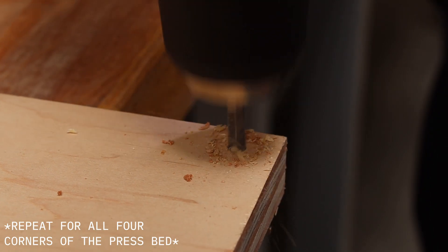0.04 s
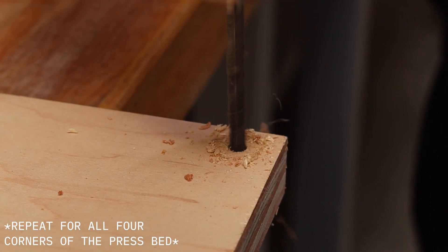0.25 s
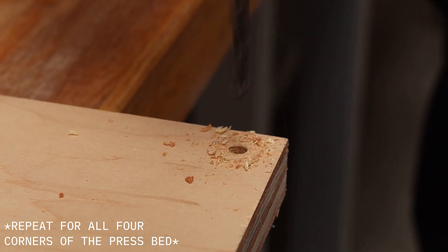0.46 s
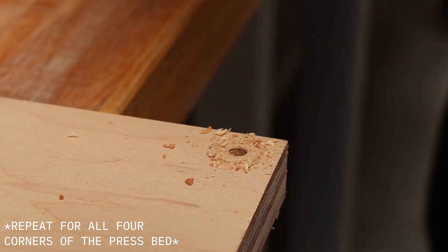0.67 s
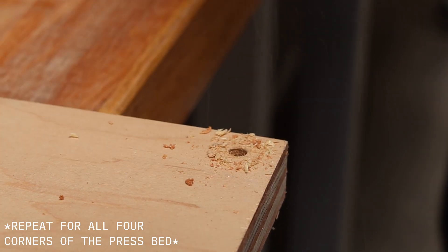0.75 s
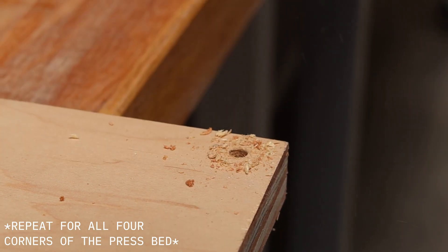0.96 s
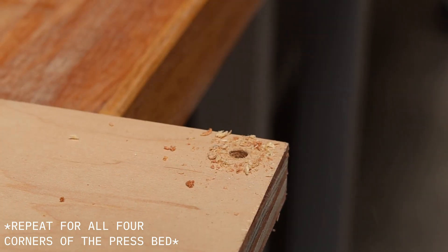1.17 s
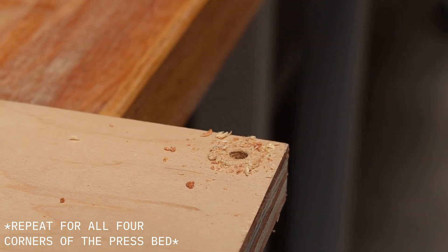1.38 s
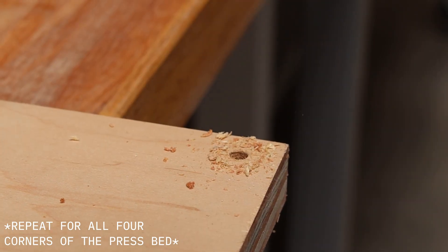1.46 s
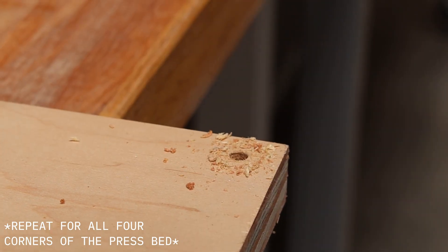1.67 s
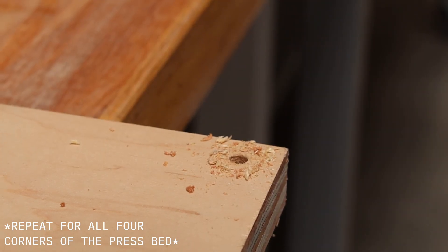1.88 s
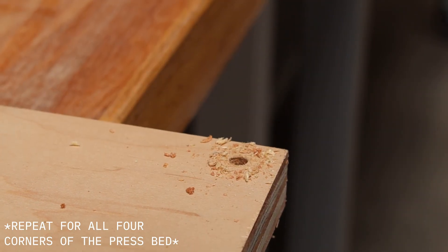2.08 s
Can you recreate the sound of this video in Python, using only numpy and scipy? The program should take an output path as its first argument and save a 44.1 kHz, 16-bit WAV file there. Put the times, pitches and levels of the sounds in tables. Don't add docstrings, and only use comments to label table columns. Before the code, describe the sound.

A handheld drill, already running, backs out of plywood close to a stereo microphone; its shrill whine rises slightly, sags and stops at about 0.6 seconds with hard clacks, leaving workshop echo, low hum and faint cloth rustle.

```python
import sys
import numpy as np
from scipy import signal
from scipy.fft import rfft, irfft
from scipy.io import wavfile
from scipy.ndimage import uniform_filter1d, map_coordinates

SR = 44100
rng = np.random.default_rng(int(sys.argv[2]) if len(sys.argv) > 2 else 0)


def how_loud(loudness_db):
    steps = np.asarray(loudness_db, float) / 20
    return 10 ** steps


def materialize(psi):
    bounded = np.clip(np.atleast_2d(psi).T, -1, 1)
    quanta = np.round(bounded * 32767).astype(np.int16)
    wavfile.write(sys.argv[1], SR, quanta)


N = 94109
T = np.arange(N) / SR
BIT_OUT_S, STOP_S, STOP_FADE_S = 0.344, 0.594, 0.003


def unit(x):
    return x / np.sqrt(np.mean(x ** 2) + 1e-30)


def on_hz(table, hz):
    a = np.array(table, float)
    return np.interp(np.log(hz + 1), np.log(a[:, 0]), a[:, 1])


def colour(x, table):
    hz = np.arange(N // 2 + 1) * SR / N
    return irfft(rfft(x) * how_loud(on_hz(table, hz)), N)


def ring(x, peaks):
    out = 0
    for k, (hz, width, db) in enumerate(peaks):
        b, a = signal.iirpeak(hz, hz / width, SR)
        out = out + (-1) ** k * how_loud(db) * signal.lfilter(b, a, x)
    return out


def walk(rate):
    k = int(SR / rate)
    return unit(uniform_filter1d(uniform_filter1d(rng.standard_normal(N), k), k))


def until(end_s, fade_s):
    return 1 / (1 + np.exp(np.clip((T - end_s) / fade_s, -50, 50)))


def half_octaves(hz, centre):
    return np.clip(1 - np.abs(2 * np.log2(hz / centre + 1e-9)), 0, 1)


def breathing_bands(table, flicker_db, rate):
    spec = rfft(rng.standard_normal((2, N)))
    hz = np.arange(spec.shape[1]) * SR / N
    spec = spec * how_loud(on_hz(table, hz))
    out = 0
    for centre in 25 * 2 ** np.arange(0, 9.6, .5):
        band = irfft(spec * half_octaves(hz, centre), N)
        out = out + band * how_loud(flicker_db * walk(rate))
    return unit(out)


def spread(mid, other):
    # pitch_hz, level_db
    diffuse = [(60, 3.5), (300, -5), (1400, -3), (2800, -6), (4500, -11), (6500, -6.5), (10000, -0.5)]
    side = colour(other, diffuse)
    return np.array([mid + side, mid - side])


def motor():
    # start_s, whine_hz, whine_level_db, rattle_level_db (the last holds until the stop)
    course = [
        (0.0, 3888, -37, -37),
        (0.056, 4266, -36.5, -40.5),
        (0.122, 4479, -41.5, -39),
        (0.236, 4538, -36, -39.5),
        (0.44, 4585, -40.5, -41.5),
        (0.526, 4160, -41, -45),
        (0.572, 3917, -45.5, -45.5),
        (0.577, 3894, -44, -40.5),
    ]
    multiples = [.5, 4, 6, 7, 9, 10, 11, 14, 15, 20, 21, 24, 25, 26, 27, 28, 30, 35, 36]
    multiple_db = [-27.5, -18, -17, -16, -24, -17, -23, -22, -16.5, -26, -32, -25, -32, -28, -35, -33, -28,
                   -33, -32]
    # pitch_hz, width_hz, level_db
    housing = [(1386, 73, 0.5), (1516, 69, 0), (1830, 49, -3), (1900, 76, 4.5), (2120, 110, -6),
               (2310, 53, -3), (2500, 34, 0), (2683, 100, 0.5), (2905, 260, 1.5), (3540, 710, -0.5),
               (4370, 1180, -1.5), (5160, 250, -11)]
    # pitch_hz, level_db per Hz
    fan_colour = [(150, -32), (700, -19), (1300, -5), (2200, -4.5), (5500, -9.5), (6200, -16.5),
                  (13500, -26), (15300, -46)]
    # pitch_hz, level_db
    fan_apart = [(300, -1), (1000, -30), (4000, -17), (7000, -11), (12000, -2)]
    bars, teeth_per_s, rattle_db = 12, 2500, -4.5
    trigger_off_s, buzz_fade_s = 0.439, 0.044

    at, whine_hz, whine_db, load_db = np.array(course, float).T
    speed = np.interp(T, at, whine_hz) * (1 + .00015 * walk(70))
    turns = np.cumsum(speed) / SR / bars
    whine = np.sin(2 * np.pi * bars * turns) * how_loud(0.5 * walk(64))
    for k, db in zip(multiples, multiple_db):
        fade = 1
        if k < 1:
            fade = (T > BIT_OUT_S) * np.exp(-np.maximum(T - trigger_off_s, 0) / buzz_fade_s)
        level = fade * how_loud(db + 0.59 * walk(49))
        whine = whine + level * np.sin(2 * np.pi * (k * turns + rng.random() + .012 * walk(42)))

    hits = rng.random(N) < teeth_per_s / SR
    teeth = hits * rng.standard_normal(N) * how_loud(2.8 * rng.exponential(size=N))
    same = map_coordinates(rng.standard_normal(256), [turns % 5 / 5 * 256], mode="grid-wrap")
    rattle = unit(ring(unit(teeth) + 0.59 * same, housing))
    slack = np.clip((T - BIT_OUT_S) / 0.1, 0, 1)
    chatter = unit(ring(teeth, [(1980, 420, 0)]))
    rattle = rattle + slack * how_loud(-rattle_db) * chatter

    fan, apart = breathing_bands(fan_colour, 1.5, 25)
    load = until(STOP_S, STOP_FADE_S) * how_loud(np.interp(T, at, load_db))
    singing = until(.581, 0.0018) * np.sqrt(2) * how_loud(np.interp(T, at, whine_db))
    tool = singing * whine + load * (how_loud(rattle_db) * rattle + fan)
    return tool, load * colour(apart, fan_apart)


def bit():
    # pitch_hz, width_hz, level_db
    board_modes = [(422, 144, -5.5), (690, 32, 4), (885, 175, -6), (1330, 150, -28)]
    # start_s, level_db, pitch_hz, length_s
    snags = [
        (.004, -38.5, 700, 0.0064),
        (0.058, -44.5, 885, 0.017),
        (0.099, -43, 890, 0.017),
        (0.255, -43, 680, 0.0099),
        (0.306, -52, 690, 0.05),
        (0.596, -53, 510, 0.0072),
        (0.59, -47, 950, 0.004),
    ]
    # pitch_hz, level_db per Hz
    bench = [(18, -9), (30, 2), (45, -1), (70, -1), (130, -5.5), (350, -12), (600, -25.5)]
    hits = rng.random(N) < 500 / SR
    knocks = hits * rng.standard_normal(N) * how_loud(1.5 * rng.exponential(size=N))
    inside = until(BIT_OUT_S, 0.002)
    level = how_loud(-53 + 1.7 * walk(22) - 19 * np.minimum(T, 1))
    board = unit(ring(knocks, board_modes)) * level * (inside + 0.17 * (T < STOP_S))
    for s, db, hz, length in snags:
        env = np.exp(-np.where(T < s, (s - T) / 0.0081, (T - s) / length))
        tone = np.sin(2 * np.pi * (hz * T + 0.091 * walk(86)))
        board = board + how_loud(db + 4.3 * walk(155)) * env * tone
    a, b = (unit(colour(rng.standard_normal(N) * how_loud(1.0 * walk(114)), bench)) for _ in range(2))
    rumble = np.array([1.07 * a + 0.74 * b, 1.32 * a - 0.81 * b])
    return board, inside * how_loud(-55.5) * rumble


def shop(x):
    # pitch_hz, t60_s
    shop_t60 = [(250, 0.43), (1000, 1.5), (2500, 1.32), (4500, 1.94), (5900, 1.7), (7500, 1.42),
                (14000, 0.3)]
    # pitch_hz, level_db
    shop_colour = [(300, 2), (1000, 1), (1900, -2.5), (3000, -4), (4000, 0.5), (4570, -4), (5200, -0.5),
                   (7000, -5)]
    spec = rfft(rng.standard_normal((2, N)))
    hz = np.arange(N // 2 + 1) * SR / N
    late = 0
    for centre in 125 * 2. ** np.arange(0, 7.6, .5):
        band = irfft(spec * half_octaves(hz, centre), N)
        late = late + band * how_loud(-60 * T / on_hz(shop_t60, centre))
    late = late * (1 - np.exp(-T / 0.015))
    late = spread(late[0], 1.13 * late[1])
    early = rng.standard_normal(N) * how_loud(-60 * T / 0.067) * (T > .002)
    response = (how_loud(-20) * unit(late) + how_loud(-15.5) * unit(early)) / np.sqrt(N)
    return signal.fftconvolve(colour(x, shop_colour)[None], response, axes=1)[:, :N]


def room_hum():
    # pitch_hz, level_db per Hz
    hum_colour = [(25, -7.5), (90, -4), (200, -3), (370, -3.5), (1500, -13.5), (5500, -21), (7000, -32),
                  (15700, -31)]
    recover_s = 0.41
    duck = how_loud(-11.5 * np.exp(-np.maximum(T - STOP_S, 0) / recover_s))
    return spread(*breathing_bands(hum_colour, 1.17, 5.77)) * how_loud(-67) * duck


def clacks():
    # start_s, peak_db, rise_s, brightness_db, loudest_ring_hz
    catches = [(0.5918, -39, 0.00092, -2, 1900), (0.5917, -25, 0.0002, 7.5, 4400),
               (0.5921, -21.5, 0.00034, 2, 3100), (0.5931, -26, 0.00035, 4.5, 4400),
               (0.5958, -32, 0.00018, 5, 3100), (0.5991, -30.5, 0.0002, 8.5, 2320),
               (0.6011, -31, 0.00027, -1, 3500), (0.613, -38, 0.0029, -1, 1670),
               (0.6204, -38.5, 0.0015, 7, 2610), (0.6258, -16.5, 0.00011, -11, 5450),
               (.626, -22.5, 0.00018, -14, 2580), (0.6276, -28, 0.00045, -1, 2060),
               (0.646, -56, 0.00089, -19, 3020), (0.6546, -50, 0.00037, -5, 4500),
               (0.671, -45, 0.0014, 0, 3700), (0.675, -43.5, 0.00054, -4, 3000)]
    # pitch_hz, level_db, t60_s
    lock = [(700, -24, .012), (1050, -18, .012), (1430, -9, .013), (1800, -2, .014), (2560, -1, .013),
            (3090, 0, .013), (4400, -2, .011), (5250, 0, .007), (5900, -6, .005), (7600, -6, .008)]
    # pitch_hz, level_db per Hz
    crack_colour = [(300, -25), (1200, -7.5), (3000, -7.5), (5600, -6), (6800, -15), (12000, -20),
                    (15700, -26)]
    crack_s, crack_db, off_ring_db = 0.00084, -10.5, -14
    crack = unit(colour(rng.standard_normal(N), crack_colour))
    lags = rng.random(len(lock))
    rough = .05 * walk(1200)
    out = 0
    for s, db, rise, bright_db, near_hz in catches:
        before = np.exp(np.clip((T - s) / rise, -60, 0))
        after = np.maximum(T - s, 0)
        rings = 0
        for (hz, mode_db, t60), lag in zip(lock, lags):
            level = how_loud(mode_db + off_ring_db * np.log2(hz / near_hz) ** 2 - 60 * after / t60)
            rings = rings + level * np.sin(2 * np.pi * (hz * (T - s) + lag + rough))
        snap = how_loud(crack_db + bright_db) * crack * np.exp(-after / crack_s)
        out = out + how_loud(db) * before * (.5 * rings + snap)
    thump = how_loud(-48.5) * np.exp(-((T - catches[9][0] - .001) / 0.00061) ** 2)
    return colour(out, [(150, -40), (450, 1.0)]) + thump


def sleeve():
    # pitch_hz, level_db per Hz
    cloth = [(400, -32), (900, -5), (2000, -4.5), (4300, -1.5), (5800, -4.5), (7000, -10.5), (12000, -22),
             (15700, -36)]
    # start_s, level_db
    rub = [
        (1.12, -79),
        (1.28, -71),
        (1.31, -64),
        (1.36, -65),
        (1.41, -59.5),
        (1.46, -59.5),
        (1.52, -63),
        (1.55, -68),
        (1.9, -81),
    ]
    # start_s, peak_db, pitch_hz
    ticks = [(.911, -58.5, 2390), (1.149, -57, 2200), (1.184, -59.5, 2000), (1.2064, -55.5, 2200),
             (1.224, -65, 2500), (1.229, -70, 2090), (1.241, -56, 2010), (1.242, -66, 6000),
             (1.31, -57, 3300), (1.311, -59, 5000), (1.315, -56, 2915), (1.334, -60, 2900),
             (1.374, -49.5, 1680)]
    at, rub_db = np.array(rub, float).T
    level = how_loud(1.0 * walk(390) + np.interp(T, at, rub_db))
    a, b = breathing_bands(cloth, 0.46, 30) * level
    out = 0.72 * spread(a, 0.62 * b)
    for s, db, hz in ticks:
        d = np.maximum(T - s, 0) / .00042
        out = out + how_loud(db) * np.e * d * np.exp(-d) * np.sin(2 * np.pi * (hz * T + 0.17 * walk(1500)))
    return out


def scene():
    # pitch_hz, level_db
    wide = [(150, -4), (500, -8), (1200, -21), (2800, -15), (4500, -25), (9000, -10)]
    board, rumble = bit()
    drill, apart = motor()
    tool = drill + board + clacks()
    side = colour(irfft(1j * rfft(tool), N), wide) + apart
    near = colour(np.array([tool + side, tool - side]), [(20, -36), (120, -0.5)])
    return near + shop(tool) + rumble + room_hum() + sleeve()


def band_limit(x):
    return signal.sosfilt(signal.butter(12, 15870, fs=SR, output="sos"), x)


def record(dry):
    # pitch_hz, level_db
    pan = [(60, 3), (250, 3.5), (700, 2.5), (1400, 0), (2800, 1.5), (4500, 4.5), (7000, 3), (11000, 0.5)]
    # pitch_hz, level_db
    edge = [(15500, 0), (15850, -70)]
    ceiling = 0.12
    half = np.array(pan, float) * [1, .5]
    ports = np.array([colour(dry[0], half), colour(dry[1], half * [1, -1])])
    mix = colour(ceiling * np.tanh(ports / ceiling), edge)
    return band_limit(mix)


dry = scene()
out = record(dry)
materialize(out)
```